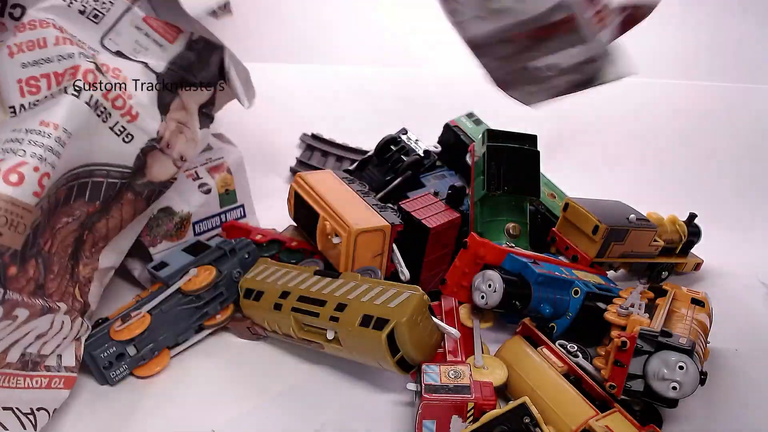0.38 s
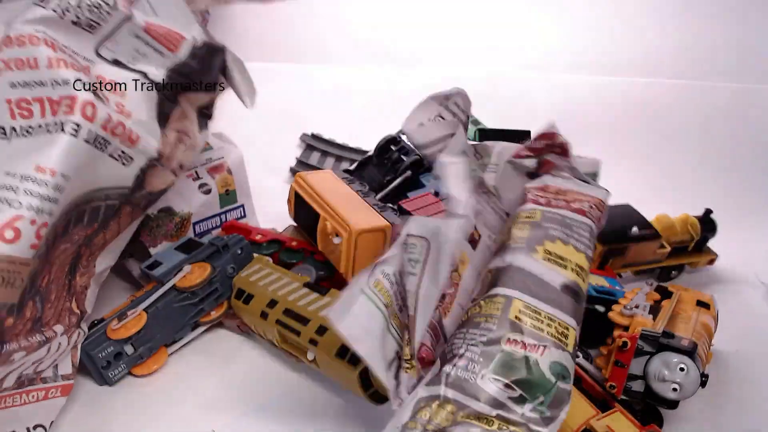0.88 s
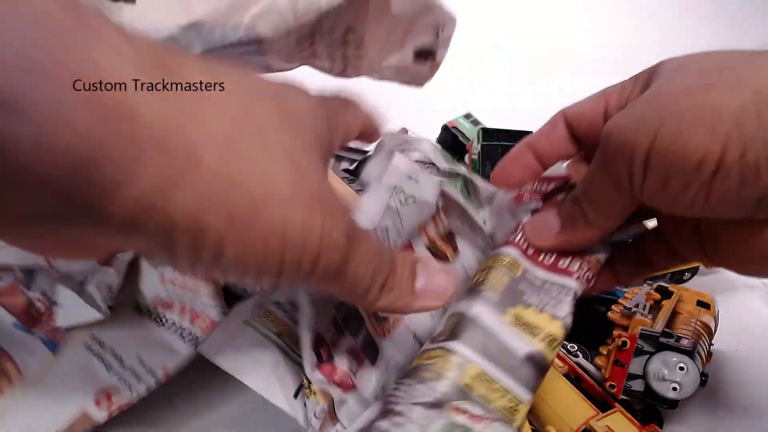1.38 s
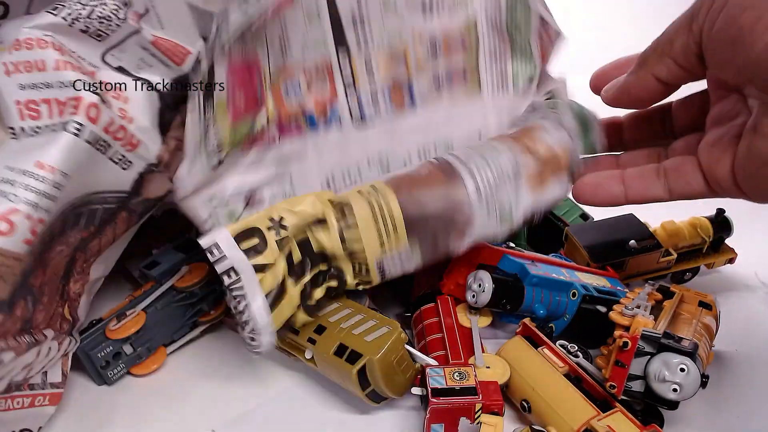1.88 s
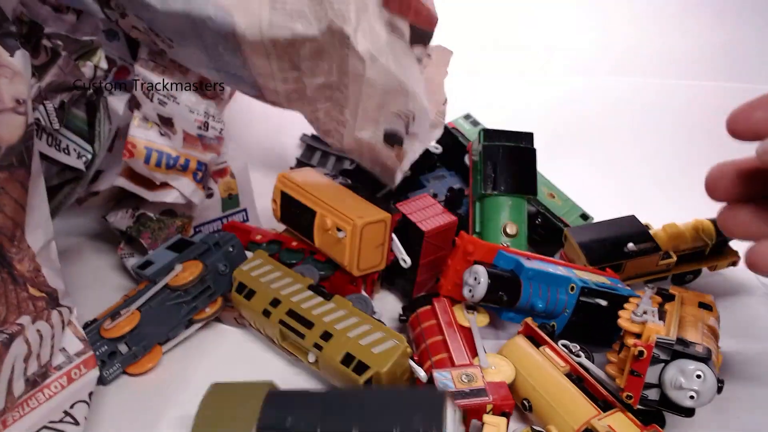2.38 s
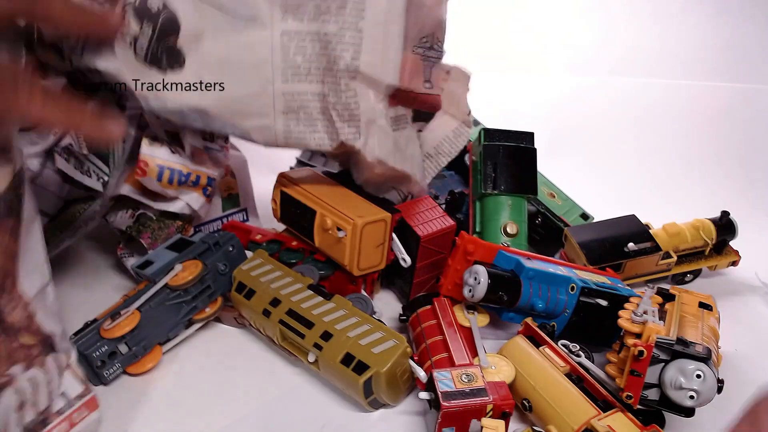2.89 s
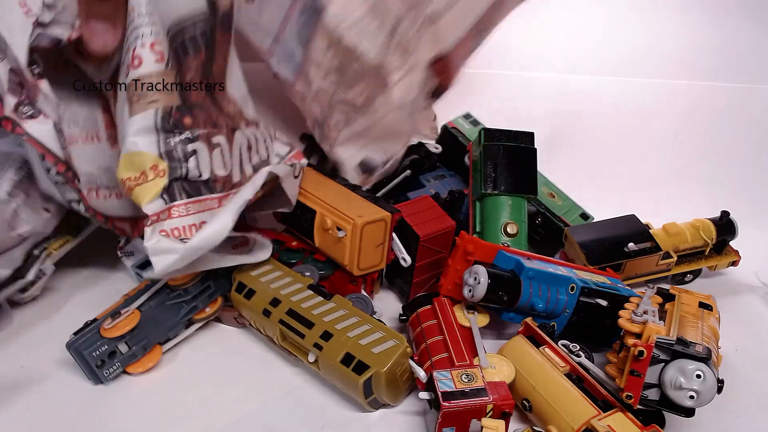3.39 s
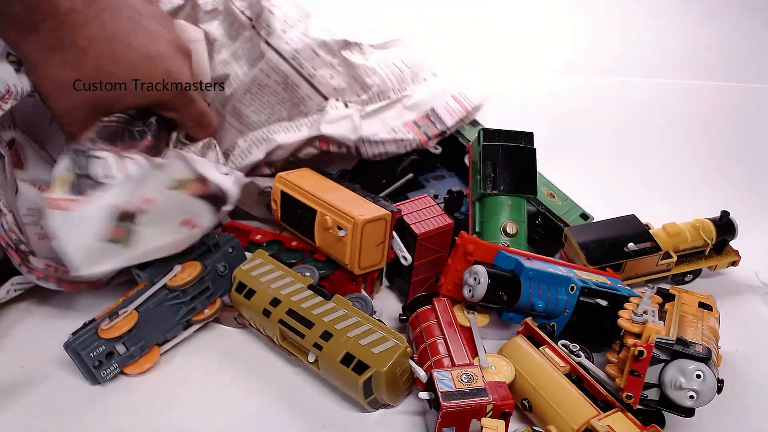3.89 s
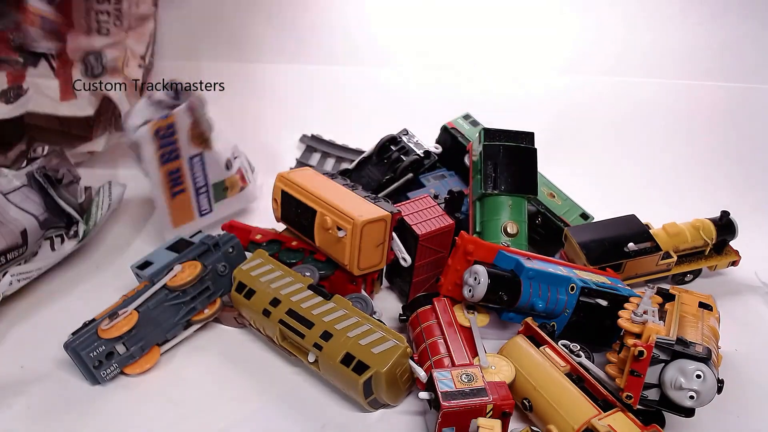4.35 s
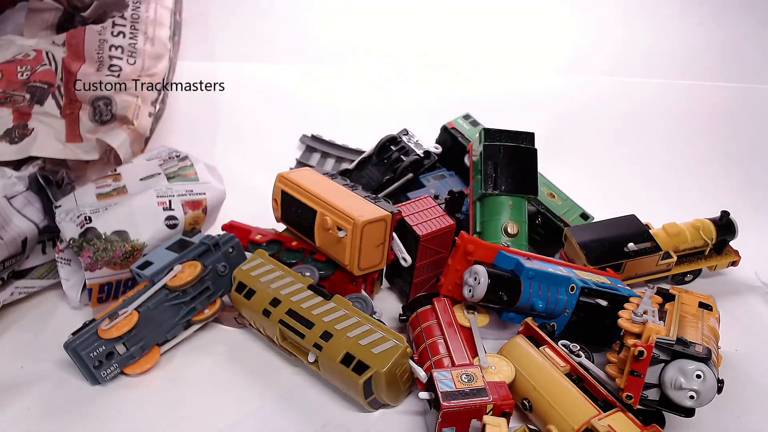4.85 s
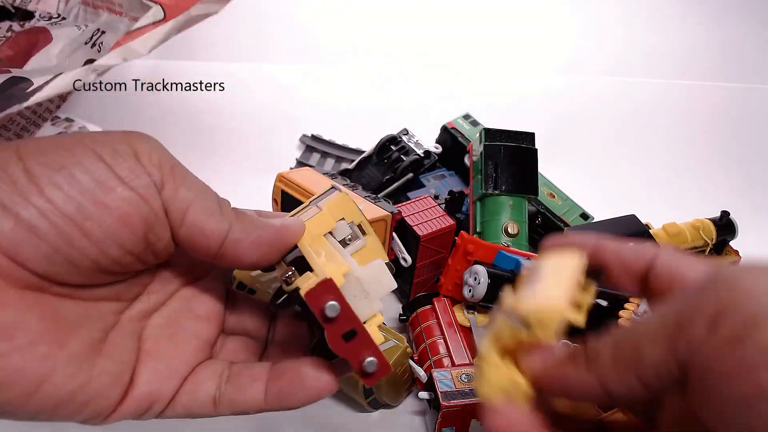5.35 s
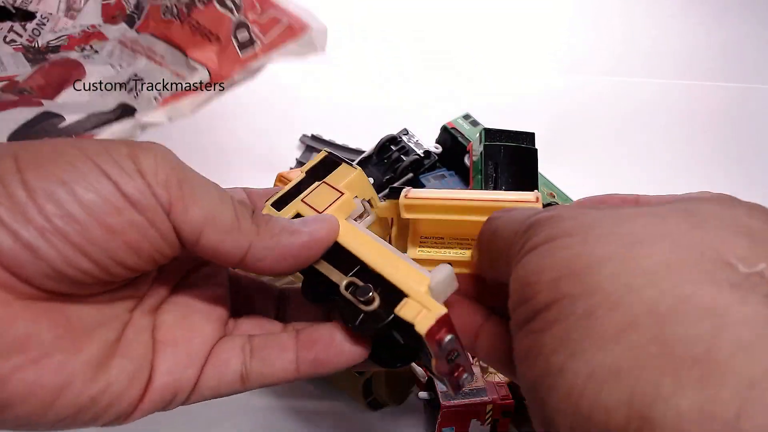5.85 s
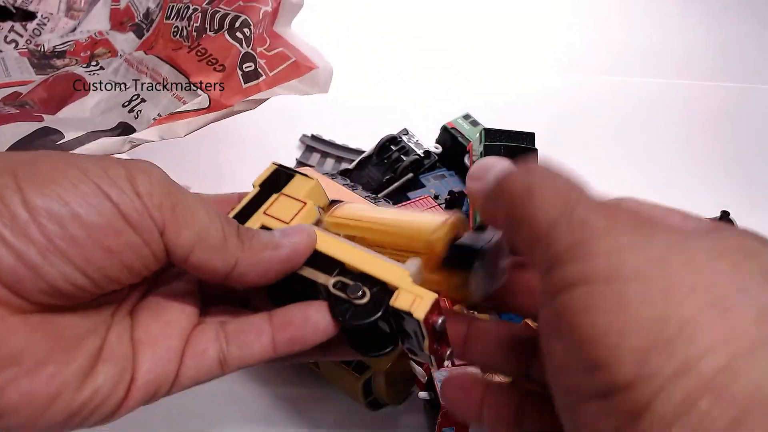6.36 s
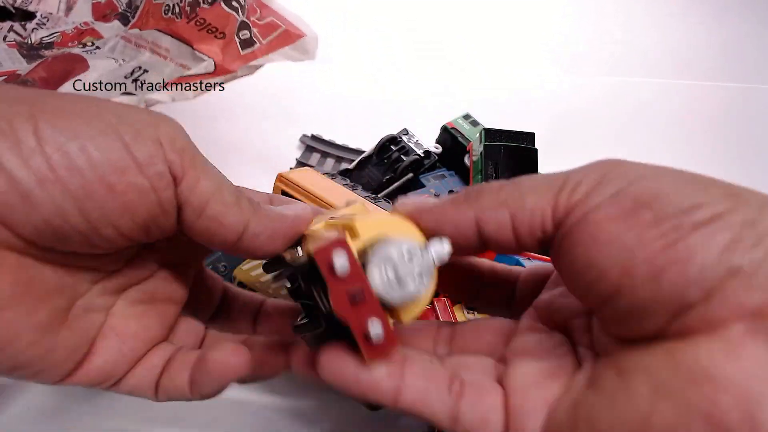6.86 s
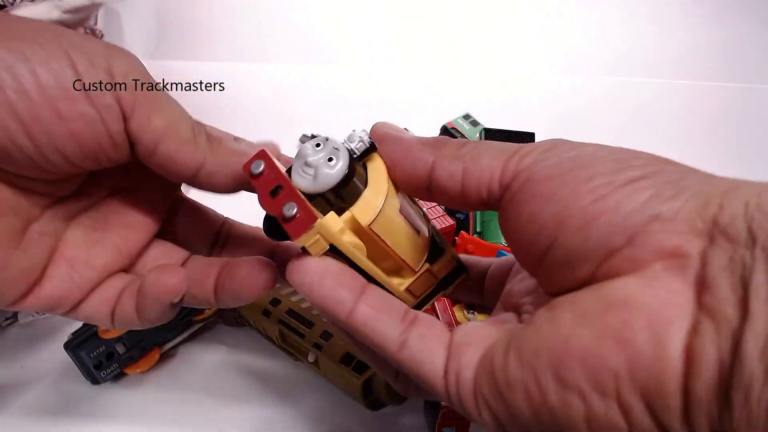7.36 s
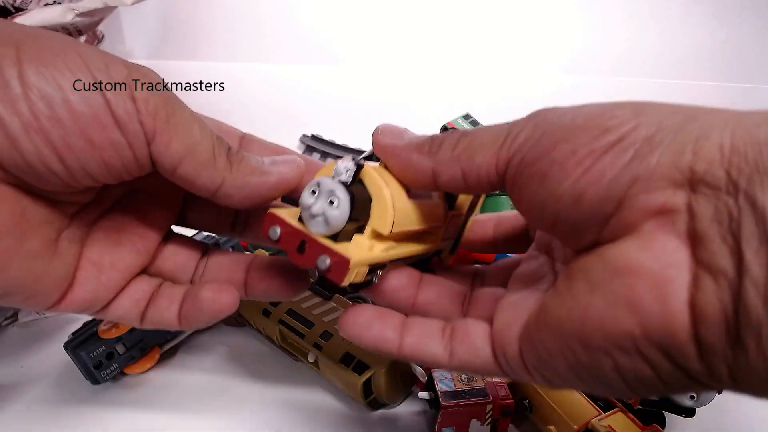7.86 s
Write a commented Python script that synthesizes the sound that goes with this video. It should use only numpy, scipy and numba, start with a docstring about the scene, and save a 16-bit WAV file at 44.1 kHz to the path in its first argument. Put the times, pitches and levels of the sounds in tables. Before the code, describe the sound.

A close stereo pickup at a table in a quiet room, dull in the highest treble, with a soft low hum throughout. From 0 to 5 seconds, sped-up newsprint crackles in hurried surges with short gaps, full of sharp crease snaps and low table rumble. A solid thump lands near 0.65; stronger thumps cluster from 2.05 to 2.3 with loud snaps. After 2.5 the rustling continues with fewer thumps, surging around 2.8-3.1, 3.3-3.65 and 3.7-4.25, then briefer, weaker swishes and a soft thump at 4.4. At 5.04 the rustle stops abruptly. Natural-paced toy handling follows: faint ticks, small dry clacks at 5.6-5.8, near quiet, then a loud hollow plastic rattle-snap at 6.32-6.5. Smaller clacks and short scrapes continue to about 7.2, then mostly faint fiddling, with one clearer click at 8.1.

```python
"""At a table in a quiet room, close to a small stereo microphone: a sped-up time-lapse of crumpled newsprint
being pulled off plastic toys, in hurried surges of crackle (swarms of tiny damped rings) and rumble. Snaps are
volleys of clicks ringing a stiff panel; toys dropped on the table top thump as decaying swings. An edit cuts
the rustle off, then at natural pace a plastic toy is fitted together by hand: short hollow clacks, scrapes and
a faint rattle excite the modes of its shell. A low room hum of coloured noise lies beneath it all."""
import sys
import numpy as np
from scipy import signal
from scipy.fft import rfft, irfft, next_fast_len
from scipy.io import wavfile
from scipy.ndimage import uniform_filter1d
from numba import njit

SR = 44100
rng = np.random.default_rng(int(sys.argv[2]) if len(sys.argv) > 2 else 0)


def gain_from_db(level_db):
    """Turn a decibel level (scalar or array-like) into a linear amplitude factor."""
    decades = np.asarray(level_db, float) / 20
    return 10 ** decades


def master(y):
    """Save y as 16-bit WAV."""
    cut = np.clip(np.atleast_2d(y).T, -1, 1)
    pcm = np.round(cut * 32767)  # scale
    wavfile.write(sys.argv[1], SR, pcm.astype(np.int16))


N = 363384  # length in samples

EDIT_S = 5.042  # the sped-up part ends
OPPOSED = np.array([[1], [-1]])  # a signal in opposite phase at the left and right ports


def colour(x, points):
    """Shapes x by (Hz, dB) points and brings it to rms 1."""
    hz, db = np.transpose(points)
    n = next_fast_len(N)
    f = np.arange(n // 2 + 1) * SR / n + 1  # 1 Hz up, to keep the logarithm finite
    gain = gain_from_db(np.interp(np.log(f), np.log(hz), db))
    y = irfft(rfft(x, n) * gain, n)[..., :N]
    return y / np.sqrt(np.mean(y ** 2))


def band(x, order, hz, kind):
    """Butterworth filter: low, high or band."""
    return signal.sosfilt(signal.butter(order, hz, kind, fs=SR, output="sos"), x)


def curve(table):
    """Columns of a table, after its times, drawn as straight lines through every sample."""
    s, *columns = np.transpose(table)
    return [np.interp(np.arange(N) / SR, s, column) for column in columns]


def sides(pan_db):
    """Left and right gains for a left minus right level in dB."""
    return gain_from_db(np.array([pan_db, -pan_db]) / 2)


def add(out, s, sound, pan_db=0., lag=0):
    """Mixes a short mono or stereo sound in at s, lag samples later on the right."""
    sound = sound * sides(pan_db)[:, None]
    starts = int(s * SR), int(s * SR + lag)
    for row, part, i in zip(out, sound, starts):
        row[i:i + len(part)] += part[:N - i]


def at_level(sound, db):
    """Gives the loudest four milliseconds the power of a sine that peaks at db."""
    loudest = uniform_filter1d(sound ** 2, size=176).max()
    return sound * gain_from_db(db) / np.sqrt(2 * loudest)


def burst(t, length, rise):
    """Envelope that swells quickly, holds about length s, then falls away."""
    return (1 - np.exp(-t / rise)) * np.exp(-(t / max(length, .0003)) ** 1.7)


def uneven(a, b, size):
    """Noise a broken into a volley of clicks by the smoothed noise b."""
    chatter_db = 3.5  # spread of the level
    return a * gain_from_db(chatter_db * uniform_filter1d(b, size=size) * np.sqrt(size))


@njit
def grains(start, hz, t60, size, lag, n, sr):
    """Damped rings, each reaching the right port lag samples after the left."""
    out = np.zeros((2, n + 4200))
    for g in range(len(start)):
        # one sample's turn and decay
        p = np.exp(2j * np.pi * hz[g] / sr - np.log(1000) / (t60[g] * sr))
        z = size[g] + 0j
        for i in range(min(int(t60[g] * sr), 4000)):
            z *= p
            out[0, start[g] + 50 + i] += z.imag
            out[1, start[g] + 50 + lag[g] + i] += z.imag
    return out[:, 50:n + 50]


def crackle(count, cycles, spread_db, lag, centre, low_hz, high_hz):
    """Scattered micro-clicks of any pitch in the range, most tiny and a few big, from all over the surface."""
    when, pitch, big, sign, where = rng.random((count, 5)).T
    start = (when * N).astype(np.int64)
    hz = low_hz + (high_hz - low_hz) * pitch
    size = gain_from_db(-spread_db * np.log(1 - big)) * np.sign(sign - .5) * np.sqrt(hz)
    lags = np.round(centre[start] + lag * (2 * where - 1)).astype(np.int64)
    return grains(start, hz, cycles / hz, size, lags, N, 1. * SR)


def flutter(rate, depth_db):
    """Gain of rms 1 whose jumps, about rate per second, start at once and die away."""
    k = SR / rate  # mean gap in samples
    kicks = rng.random(N) * (rng.random(N) < 1 / k)
    walk = signal.lfilter([1], [1, -np.exp(-2 / k)], kicks)
    gain = gain_from_db(depth_db * np.tanh(walk / walk.std() / 2))
    return gain / np.sqrt(np.mean(gain ** 2))


# hurried surges of the sped-up paper; the last column is the rumble through the table
# columns: start_s, end_s, crackle_start_db, crackle_end_db, rumble_db
PAPER_SURGES = [(0, 0.221, -45.5, -40.5, -51.5), (.33, 0.535, -39.5, -46.5, -50.5),
                (0.651, 0.835, -36, -47, -47.5), (1.123, 1.53, -43.5, -37.5, -46),
                (1.609, 1.757, -39.5, -39, -43.5), (1.84, 2.203, -37, -43.5, -45),
                (2.301, 2.42, -45.5, -47.5, -57), (2.753, 3.084, -46.5, -43, -44),
                (3.283, 3.655, -41, -37.5, -44), (3.701, 4.259, -39.5, -43.5, -48.5),
                (4.355, 4.459, -48.5, -48.5, -47.5), (4.537, 5.05, -45.5, -44, -49)]


def surges():
    """Crackle and rumble levels in dB: each sped-up surge rises fast, holds, and falls back after it."""
    rise_db_per_s, fall_db_per_s = 311, 115
    rest_db = -57  # crackle between surges
    t = np.arange(N) / SR
    crackle_db, rumble_db = np.full(N, 1. * rest_db), np.full(N, rest_db - 2.0)
    for start, end, first_db, last_db, table_db in PAPER_SURGES:
        away_db = rise_db_per_s * np.maximum(start - t, 0) + fall_db_per_s * np.maximum(t - end, 0)
        surge_db = np.interp(t, [start, end], [first_db, last_db])
        crackle_db = np.maximum(crackle_db, surge_db - away_db)
        rumble_db = np.maximum(rumble_db, table_db - away_db)
    return crackle_db, rumble_db


# colour of the crackle; columns: pitch_hz, level_db (per Hz)
SHEET_COLOUR = [(180, -28), (300, -3.5), (668, -5.5), (849, -6), (1470, -1.5), (2000, -3), (5900, -6),
                (7090, -12.5), (8630, -11.5), (11200, -58.5), (19000, -120)]
# colour of the rumble through the table; columns: pitch_hz, level_db (per Hz)
TABLE_COLOUR = [(15, -27), (35, -2.5), (230, 6), (429, -1), (541, 0.5), (616, -7), (800, 0), (1040, -16.5),
                (1760, -120)]
# how the paper moves before the microphone
# columns: start_s, left_minus_right_db, right_lag_samples, brightness_db, smooth_slide_share (0-1)
PAPER_PLACE = [(0, -2.5, -0.5, 4, 0.13), (.7, -2.5, -1, 5, .2), (1.2, -1, -1, 2.5, 0.1),
               (1.9, -1.4, 0, 4.5, 0.5), (2.45, -0.3, 5.1, 5, 0.3), (2.75, 0.5, 6.5, 3, 0.4),
               (3.2, -.5, 2.62, 2, 0.3), (4.2, 0.2, 3, 1.5, 0.37), (4.55, -0.5, 6.5, 6.5, 0.9),
               (5.04, 0.5, 6, 4.5, 0.66)]


def paper():
    """Sped-up paper: dense crackle in flurries over a smoother slide, with a dull rumble through the table."""
    crackle_db, rumble_db = surges()
    pan_db, lag, bright_db, slide = curve(PAPER_PLACE)
    slide = np.clip(slide, 0, 1)
    grit = crackle(count=30000, cycles=13.0, spread_db=2.5, lag=4.2, centre=lag, low_hz=200, high_hz=9700)
    hush = crackle(count=90000, cycles=3., spread_db=2.0, lag=2.9, centre=lag, low_hz=200, high_hz=9650)
    flurries = colour(grit, SHEET_COLOUR) * flutter(61, 8.5)
    rest = flurries * np.sqrt(1 - slide) + colour(hush, SHEET_COLOUR) * np.sqrt(slide)
    # panels and creases of each size come and go apart from each other, so the colour keeps shifting
    sheet = 0
    for split_hz, share in ((900, 0.17), (2000, 0.35), (3500, 0.22), (5500, 0.3)):
        low = signal.sosfiltfilt(signal.butter(2, split_hz, fs=SR, output="sos"), rest)
        sheet = sheet + low * flutter(50, 11.0) * gain_from_db(share * bright_db)
        rest = rest - low
    sheet = sheet + rest * flutter(67, 8.8) * gain_from_db(bright_db)
    drag = colour(rng.standard_normal((2, N)), TABLE_COLOUR)
    mid, side = drag * flutter(30, 9.) * gain_from_db(rumble_db)
    rumble = mid + .12 * side * OPPOSED
    return gain_from_db(crackle_db) * sheet * sides(pan_db) + rumble


# colour of the room tone; columns: pitch_hz, level_db (per Hz)
ROOM_TONE = [(15, -29), (25, -3), (81, -8), (122, -3.5), (145, -5), (248, -8), (332, -16.5), (527, -11.5),
             (567, -22), (4850, -39), (8500, -35.5), (11000, -58), (18700, -120)]


def hum():
    """Steady room tone, nearly alike at both ports in the bass and unrelated in the treble."""
    mid, side = colour(rng.standard_normal((2, N)), ROOM_TONE)
    side = 0.35 * side + band(side, 1, 1800, "high")
    return gain_from_db(-71) * (mid + side * OPPOSED)


# creases giving way; columns: start_s, level_db, ringing_hz
CREASES = [(0.05, -27, 1220), (0.137, -28.5, 1550), (0.181, -24.5, 1240), (0.33, -20.5, 1170),
           (0.419, -29, 867), (0.458, -28, 1580), (0.472, -18.5, 1190), (0.63, -27, 2810),
           (0.655, -17, 1840), (0.678, -22, 1540), (0.744, -30, 1460), (0.771, -29.5, 2650),
           (0.797, -30, 2550), (0.852, -28, 1550), (0.868, -28, 1650), (0.945, -38, 4300),
           (0.983, -43, 2970), (1.112, -25, 1420), (1.147, -27.5, 1550), (1.352, -28, 1130),
           (1.421, -21, 1560), (1.454, -21.5, 1660), (1.491, -22, 883), (1.649, -27, 3970),
           (1.683, -24.5, 3950), (1.703, -24, 1630), (1.831, -27, 1400), (1.855, -25.5, 1410),
           (1.911, -26, 1420), (1.986, -28, 2660), (2.022, -21.5, 4890), (2.047, -16.5, 1710),
           (2.059, -17.5, 1810), (2.123, -24, 1710), (2.142, -22, 1750), (2.203, -24.5, 1770),
           (2.245, -26.5, 1890), (2.257, -26, 1380), (2.298, -14.5, 1490), (2.392, -27, 2270),
           (2.451, -30, 1250), (2.507, -35, 770), (2.524, -22, 1250), (2.824, -30.5, 1450),
           (2.889, -30, 1640), (2.947, -26.5, 1640), (3.081, -32, 1330), (3.233, -34, 1330),
           (3.465, -27.5, 3890), (3.646, -27.5, 786), (3.791, -27.5, 1450), (3.998, -27, 818),
           (4.047, -26.5, 5580), (4.412, -34, 877)]


def snaps():
    """Each crease fails as a ragged volley of clicks that rings the stiff panel beside it and rustles out."""
    length_s, rise_s = 0.005, 0.0023  # the volley and its swell
    out, t = np.zeros((2, N)), np.arange(4000) / SR
    noise = rng.standard_normal((len(CREASES), 3, len(t)))
    pan_db, lag = curve(PAPER_PLACE)[:2]
    shape = burst(t, length_s, rise_s) + 0.11 * burst(t, 5.4 * length_s, .003)
    for (s, db, hz), (a, b, c) in zip(CREASES, noise):
        # a crease is long, so the ports hear somewhat different treble
        spread = band(c, 1, 2500, "high")
        volley = uneven(a + 0.66 * spread * OPPOSED, b, size=30) * shape
        broad = band(volley, 2, [700, 6000], "band")
        ring = signal.lfilter(*signal.iirpeak(hz, 4., fs=SR), volley)
        i = int(s * SR)
        add(out, s, at_level(broad + 2.3 * ring, db), pan_db[i], 1.3 * lag[i])
    return out


# blows on the table top, level before the bass is thinned; columns: start_s, peak_db, pitch_hz
TABLE_BLOWS = [(0.323, -29.5, 163.7), (0.463, -26.5, 224), (0.653, -14, 102.2), (0.739, -26.5, 109),
               (0.861, -29.5, 103), (1.42, -25, 237), (1.569, -23.5, 108.4), (1.711, -21.5, 117.7),
               (1.915, -32, 104), (2.024, -29, 99.6), (2.054, -16, 104), (2.125, -17, 107),
               (2.195, -22, 114), (2.251, -11, 110), (2.305, -13, 127), (2.356, -25, 104),
               (2.397, -33.5, 101), (2.452, -29, 92), (2.5, -27, 105), (2.527, -24, 115.6),
               (4.409, -23, 114.7), (4.466, -34, 121), (4.969, -33, 146.4), (5.089, -47, 81)]


def thumps():
    """The table top swings briefly under a soft blow, then hums on weakly, with modes below and above."""
    swing_cycles = 1.3  # how long the first swing lasts
    out, t = np.zeros((2, N)), np.arange(9000) / SR
    for s, db, hz in TABLE_BLOWS:
        swing = np.exp(-(t * hz / swing_cycles) ** 2)
        fade = (swing + .3 * np.exp(-t / 0.028)) * (1 - np.exp(-t / 0.0045))
        turn = 2 * np.pi * hz * t
        modes = np.sin(turn) + 0.31 * np.sin(1.95 * turn + 0.23)
        modes = modes + 0.31 * np.sin(0.66 * turn) + 0.14 * np.sin(2.9 * turn)
        ring = fade * modes
        add(out, s + .005, ring * gain_from_db(db) / np.abs(ring).max(), -.9)
    # the top is too small to radiate the deepest bass
    return band(out, 2, 55, "high")


# modes of the hollow toy; columns: pitch_hz, level_db, t60_s (time to fall 60 dB)
SHELL_MODES = [(1350, -39, .008), (1740, 3, 0.02), (2030, 8, 0.0074), (2570, -4.5, 0.0091),
               (2698, 8.5, 0.0072), (2980, -9, 0.0082), (3896, 2, 0.008), (4200, -5, 0.008),
               (4800, 2, 0.008), (5690, -0.5, 0.007), (6300, -11, .006)]


def shell(x, gains_db, grip):
    """The hollow toy's modes driven by x; grip multiplies the pitch of each."""
    y = 0
    for (hz, db, t60), more_db, shift in zip(SHELL_MODES, gains_db, grip):
        r = np.exp(-np.log(1000) / (max(t60, .003) * SR))
        w = 2 * np.pi * hz * shift / SR
        y = y + gain_from_db(db + more_db) * signal.lfilter([np.sin(w)], [1, -2 * r * np.cos(w), r * r], x)
    return y


# fingers turning the toy; columns: start_s, rattle_db
FINGERS = [(5.05, -70.5), (5.25, -80.5), (5.36, -103), (5.52, -77.5), (5.8, -74), (6.02, -85), (6.15, -78),
           (6.28, -83.5), (6.5, -65.5), (6.92, -68.5), (7.1, -74.5), (7.36, -84), (7.75, -79),
           (8.24, -74.5)]


def fiddle():
    """Loose parts tick faintly inside the shell while skin slides over it."""
    ticks = crackle(count=20000, cycles=0.67, spread_db=2.0, lag=4.4, centre=np.zeros(N),
                    low_hz=900, high_hz=8000)
    rattle = shell(ticks, np.zeros(len(SHELL_MODES)), np.ones(len(SHELL_MODES)))
    rattle = 0.075 * rattle / rattle.std() + ticks / ticks.std()
    after_edit = np.arange(N) > EDIT_S * SR
    return after_edit * gain_from_db(curve(FINGERS)[0]) * rattle * flutter(37, 19.0)


def contact(hz, length, noise, rise, edge):
    """Chatter that favours shell modes near hz, plus a dry crack; the toy is too small to radiate bass."""
    a, b, c = noise
    chatter = uneven(a, b, size=20) * burst(np.arange(len(a)) / SR, length, rise)
    octaves = np.abs(np.log2(np.array(SHELL_MODES)[:, 0] / hz))
    near_db = -np.minimum(13 * octaves, 14) + 3 * c[:len(SHELL_MODES)]
    grip = 1 + 0.03 * c[-len(SHELL_MODES):]  # the fingers shift each mode a little
    crack = band(chatter, 1, 5500, "low")
    sound = shell(chatter, near_db, grip) + edge * crack
    return chatter, band(sound, 4, 1250, "high")


# plastic parts knocking; columns: start_s, level_db, loudest_region_hz, contact_length_s
KNOCKS = [(5.0977, -51.5, 1010, 0.0015), (5.129, -63, 2180, 0.0037), (5.15, -69, 2690, 0.002),
          (5.343, -64.5, 2305, 0.0015), (5.6033, -40, 1270, 0.0011), (5.6426, -41.5, 1480, 0.0033),
          (5.683, -55, 2350, 0.0019), (5.702, -58, 5000, 0.0031), (5.731, -59, 2640, 0.006),
          (5.749, -50.5, 2030, 0.0037), (5.758, -44.5, 2100, 0.0066), (5.797, -63, 2010, 0.0012),
          (5.924, -58.5, 1980, 0.0032), (6.325, -29, 2980, 0.0058), (6.335, -26, 2030, 0.0032),
          (6.347, -19, 2480, 0.002), (6.4115, -31.5, 3060, 0.0073), (6.4188, -19, 2800, 0.0015),
          (6.4346, -26.5, 2660, 0.0032), (6.455, -18.5, 1700, 0.0029), (6.4804, -34.5, 1770, 0.0015),
          (6.512, -42.5, 2860, 0.007), (6.572, -43, 1640, 0.0032), (6.599, -56.5, 1480, 0.0025),
          (6.633, -34.5, 1700, 0.0076), (6.666, -33.5, 1610, 0.0013), (6.678, -35.5, 1720, 0.002),
          (6.799, -46.5, 6020, 0.0056), (6.835, -60, 1550, 0.0034), (6.846, -37.5, 4660, 0.0037),
          (6.887, -45, 1990, 0.0025), (6.955, -53.5, 1840, 0.0054), (7.039, -60, 1870, 0.003),
          (7.063, -46, 1740, 0.0041), (7.22, -40.5, 1720, 0.0015), (7.6904, -63, 1770, 0.0039),
          (7.725, -62, 2010, 0.0022), (7.754, -62, 1760, 0.003), (7.7863, -52, 1640, 0.0038),
          (7.945, -49.5, 1690, 0.003), (8.0156, -48.5, 1620, 0.0017), (8.034, -53, 1900, 0.015),
          (8.0494, -51, 1900, 0.0028), (8.1134, -38.5, 2540, 0.002), (8.117, -32, 2760, 0.0033),
          (8.1555, -44, 5500, 0.003), (8.178, -56, 1650, 0.0052), (8.206, -61.5, 1400, 0.0034),
          (8.2147, -56.5, 1790, 0.0034)]


def clacks():
    """Short hard contacts ring the shell; the palms around the toy add a dull pat."""
    out, noise = np.zeros((2, N)), rng.standard_normal((len(KNOCKS), 3, 2600))
    for (s, db, hz, length), chance in zip(KNOCKS, noise):
        # knocks are drier before 6.7 s and ring more after
        dry_crack = 7.7 if s < 6.7 else 0.96
        chatter, knock = contact(hz, length, chance, rise=0.000067, edge=dry_crack)
        pat = band(chatter, 2, [180, 700], "band")
        # the pat grows more slowly than the knock, and is weaker after 6.47 s
        pat_db = 0.29 * db + (-44 if s < 6.47 else -60)
        add(out, s, at_level(knock, db) + at_level(pat, pat_db), -.8)
    return out


# plastic sliding on plastic or skin; columns: start_s, level_db, loudest_region_hz, length_s
SLIDES = [(5.178, -77, 1215, 0.021), (5.604, -56.5, 2490, 0.018), (5.763, -55.5, 3850, 0.018),
          (6.134, -65.5, 5200, 0.045), (6.349, -28.5, 2460, 0.012), (6.384, -47, 2000, 0.028),
          (6.74, -40, 1830, 0.025), (6.831, -46.5, 2490, 0.019), (6.884, -60, 1600, 0.055),
          (6.982, -48, 2550, 0.029), (7.063, -58, 1740, 0.017), (8.116, -44.5, 1670, 0.0097)]


def scrapes():
    """Long light contacts: a rough, grainy drag."""
    out, noise = np.zeros((2, N)), rng.standard_normal((len(SLIDES), 3, 7000))
    for (s, db, hz, length), chance in zip(SLIDES, noise):
        _, drag = contact(hz, length, chance, rise=0.00099, edge=3.3)
        add(out, s, at_level(drag, db), -.5)
    return out


def room(x, t60, wet_db):
    """Short diffuse tail off table and near walls, different at each port."""
    t = np.arange(int(.3 * SR)) / SR
    fade = np.exp(-np.log(1000) * t / t60) * np.minimum(t / 0.008, 1)
    tail = band(rng.standard_normal((2, len(t))) * fade, 1, 500, "high")
    tail = tail / np.sqrt(np.sum(tail ** 2, axis=1, keepdims=True))
    return x + gain_from_db(wet_db) * signal.fftconvolve(x, tail, axes=1)[:, :N]


def scene():
    """Sped-up paper and table, then the toy, over the room tone."""
    table = thumps()
    unpacking = room(paper() + snaps() + table, 0.081, -11)
    # an edit cuts off the sped-up rustle, room tail included; dry thumps carry across
    cut = np.where(np.arange(N) < EDIT_S * SR, unpacking, table)
    toy = room(clacks() + scrapes() + fiddle(), 0.049, -9.0)
    return cut + toy + hum()


def low_pass(x):
    """Removes everything above the highest recorded frequency."""
    return signal.sosfilt(signal.butter(12, 8780, fs=SR, output="sos"), x)


def record(dry):
    """A narrow-band stereo microphone chain that falls steeply above 7440 Hz."""
    mix = band(dry, 14, 7440, "low")
    return low_pass(mix)


dry = scene()
out = record(dry)
master(out)
```